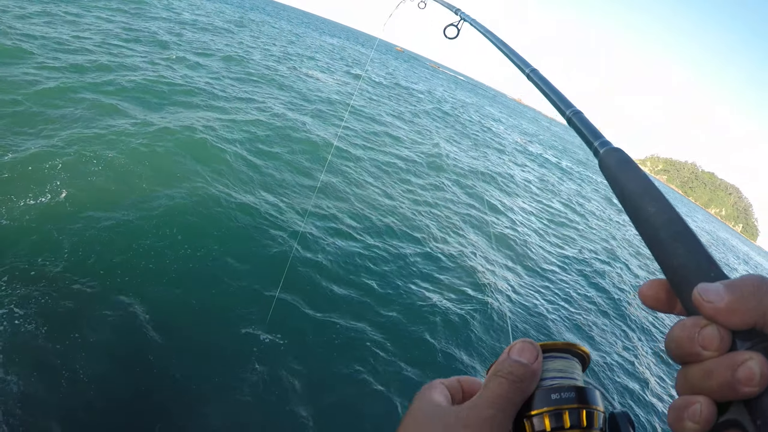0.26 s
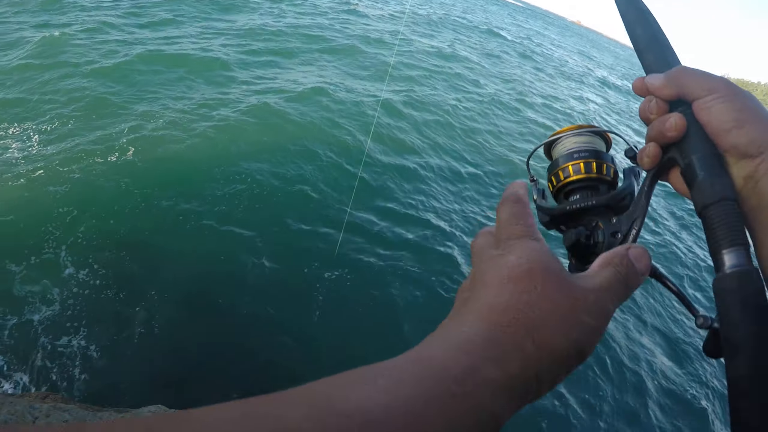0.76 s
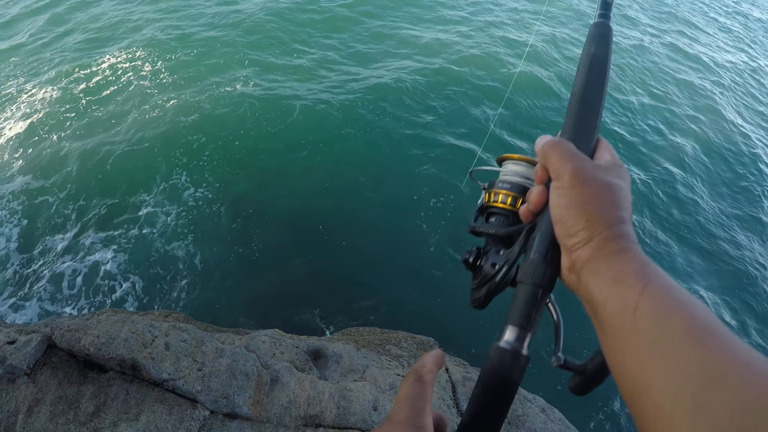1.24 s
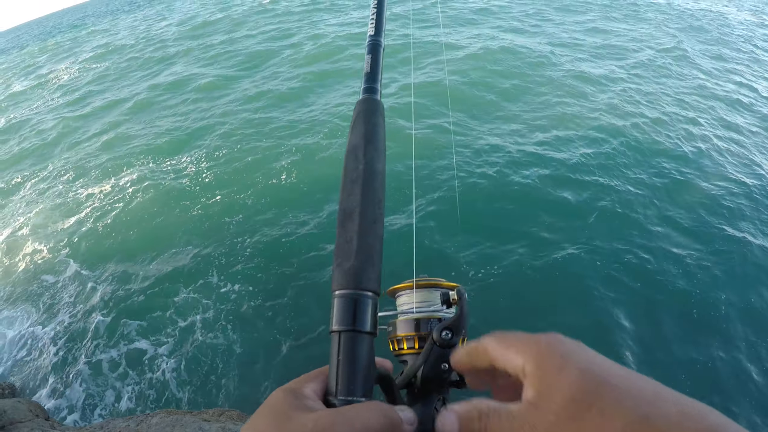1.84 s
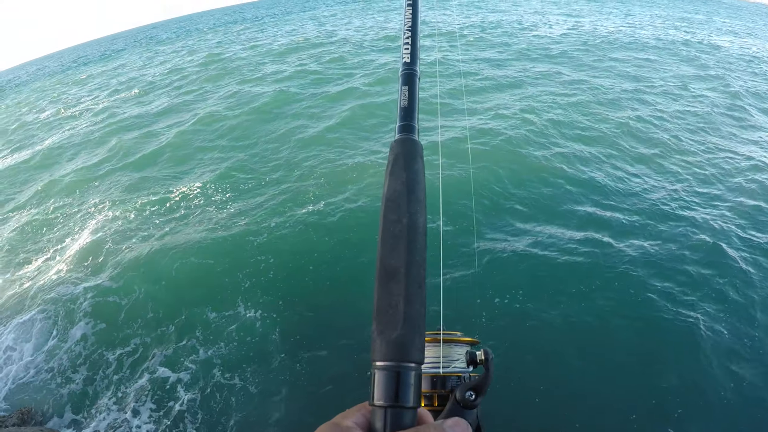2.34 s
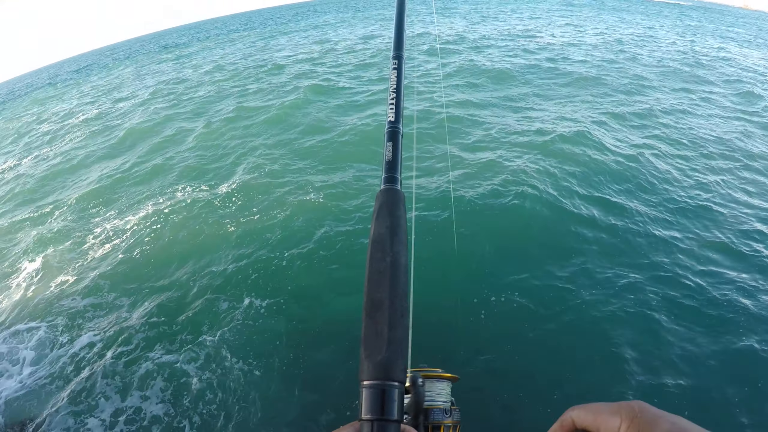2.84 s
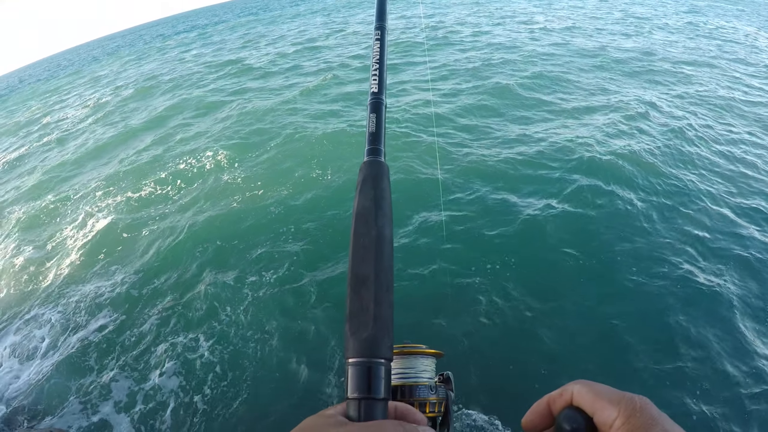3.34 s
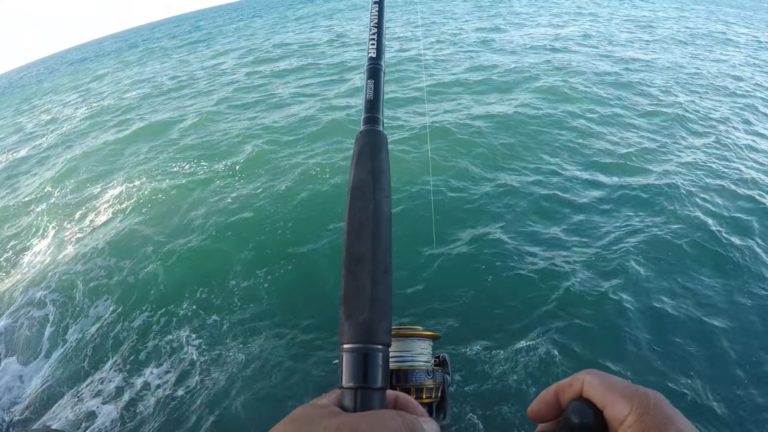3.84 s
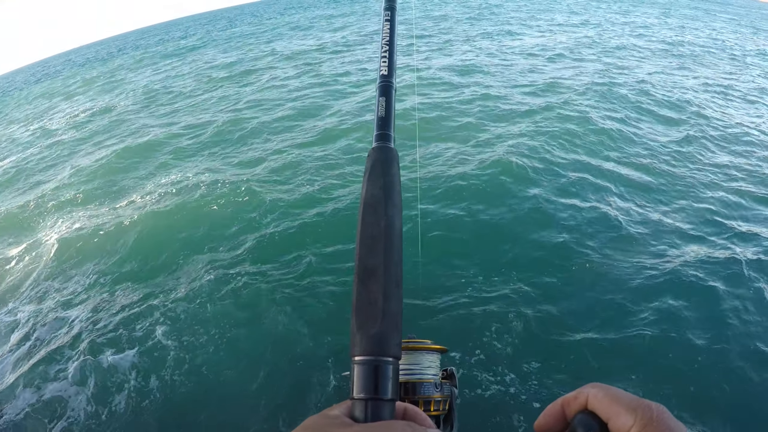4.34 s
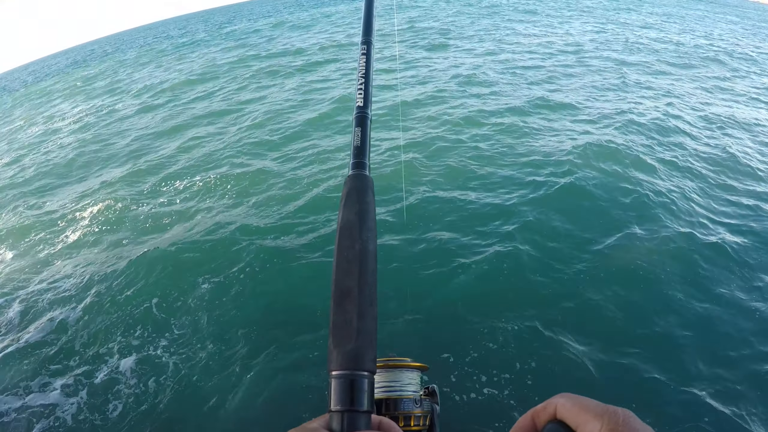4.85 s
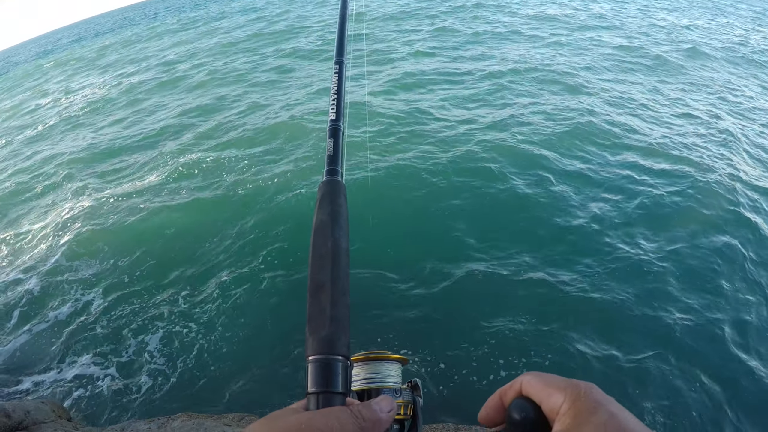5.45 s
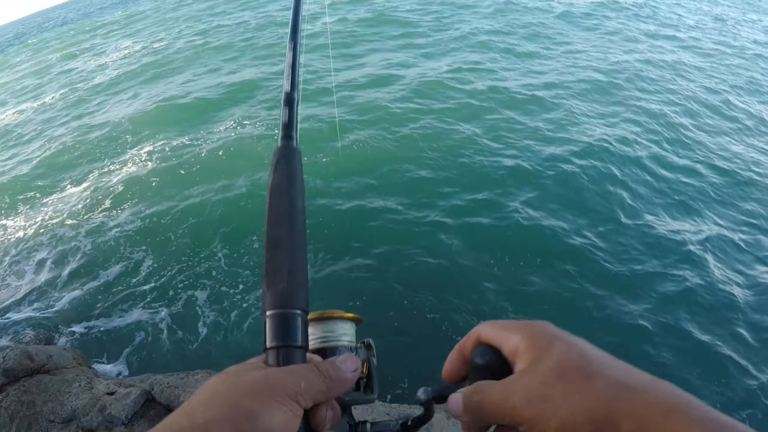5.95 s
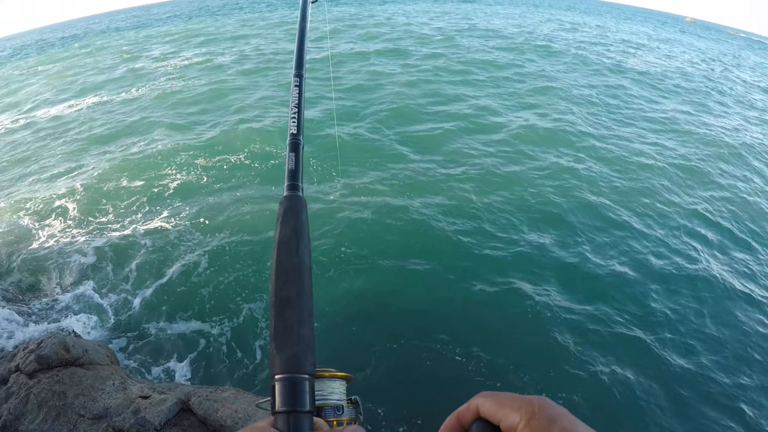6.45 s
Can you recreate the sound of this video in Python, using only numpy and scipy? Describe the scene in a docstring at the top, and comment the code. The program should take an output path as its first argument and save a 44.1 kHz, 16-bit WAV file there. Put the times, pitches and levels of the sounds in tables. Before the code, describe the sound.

Gusty wind buffets the microphone over sea washing on a rocky shore, with small drips and a few brief knocks on a fishing reel.

```python
"""A rocky shore, on a small camera's two microphone ports, out in gusty wind.
Right at the ports the wind rumbles, roars and buffets as lumpy pressure and small eddies.
Farther off and below, the sea washes and its foam fizzes; close by, drops splash on rock
and hands scuff a fishing reel, which rings briefly.
The camera starts in mono on the right port, then opens most of the way to stereo."""
import sys
import numpy as np
from scipy import signal
from scipy.fft import rfft, irfft
from scipy.io import wavfile
from scipy.ndimage import uniform_filter1d

SR = 44100
rng = np.random.default_rng(int(sys.argv[2]) if len(sys.argv) > 2 else 0)


def transcribe(u):
    """Save the signal u as a 16-bit wav file named by the first command-line argument.

    u: samples, shape (n,) or (channels, n), limited to [-1, 1]; the rate is SR.
    q: integer samples, one column per channel.
    """
    v = np.clip(np.atleast_2d(u).T, -1, 1)
    q = np.round(v * 32767).astype(np.int16)
    wavfile.write(sys.argv[1], SR, q)


N = 295470
HZ, FRAME_S = np.fft.rfftfreq(512, 1 / SR), np.arange(N // 128 + 2) * 128 / SR  # bands, frame times

# the sea below: (time [s], level [dB], body around 1 kHz [dB], left-right [dB])
SEA_WASH = [(0.0, -42, 5, 6.5), (0.28, -42, -6, 1), (0.41, -43.5, -11, -2), (0.78, -50, 5.5, 0),
            (1.06, -48, 3.5, -0.5), (1.68, -48.5, -3.5, 5), (2.56, -47, 3, 4.5), (3.5, -47, 0.5, 1),
            (3.97, -48, 3.5, 1), (4.35, -49, 6, 4), (4.55, -47.5, 4.5, 4), (4.79, -44, -1.5, 2),
            (4.91, -47.5, 4, 4.5), (5.43, -48.5, 4.5, 4), (5.67, -52, 19, 5), (6.05, -45, 0, 6),
            (6.27, -41.5, 0, 5.5), (6.47, -43, -1.5, 5.5), (6.56, -38, 3, 5.5), (6.7, -36, -3, 4)]
# colour of the wash as heard, with the treble cut off above 13 kHz: (frequency [Hz], level [dB])
HEARD_WASH_SPECTRUM = [(350, -3), (600, -3.5), (1100, -7), (1800, -8), (2400, -9.5), (3100, -15),
                       (5100, -17), (7600, -21), (8100, -24), (10200, -25.5), (11200, -33.5), (12600, -32),
                       (13500, -39), (15200, -56)]
# how alike the sea is at the two ports: (frequency [Hz], coherence [0-1])
SEA_COHERENCE = [(500, 0.91), (1000, 0.84), (1800, 0.33), (2700, 0.63), (4000, 0.25), (5200, 0.31),
                 (6800, 0.36), (9000, 0.083), (13000, .1)]
# resonances of a port: (frequency [Hz], half-width [Hz], gain [dB])
PORT_RESONANCES = [(2270, 160, -1), (3730, 77, 3.5), (4540, 1200, -1), (6400, 710, 6)]
# drops on nearby rock: (time [s], level [dB], pitch [Hz], left-right [dB], bandwidth [Hz])
ROCK_SPLASHES = [(1.1776, -27, 5090, 0, 2600), (1.284, -31.5, 2670, 2, 800), (1.6248, -35, 1970, 1, 600),
                 (2.1495, -33.5, 3770, -3, 2200), (2.6364, -29, 4540, 1, 2600),
                 (3.099, -31, 1870, -6, 2556), (3.2749, -38, 4010, -3, 1200), (3.595, -29, 5650, -10, 1700),
                 (3.65, -35, 1700, 2, 600), (3.684, -39, 2120, -10, 2300), (3.75, -31.5, 2584, -8, 2100),
                 (3.78, -29, 2170, -2, 1200), (3.838, -30, 6400, -3, 1400), (3.865, -30, 5600, -4, 800),
                 (3.872, -26.5, 1600, -4, 600), (3.892, -32.5, 3400, -2, 2200), (3.896, -34, 1920, 2, 600),
                 (3.9262, -34, 6260, -9, 1500), (3.9464, -29, 5800, -8, 2600),
                 (3.975, -28.5, 4440, 0, 3100), (4.177, -30, 6150, 16, 6000), (4.5985, -32, 6100, 3, 2400),
                 (4.603, -32, 2260, 8, 500), (4.633, -32, 6200, -10, 2100), (4.6587, -32, 5300, -3, 1500),
                 (4.9493, -34, 4170, 14, 2510), (5.9225, -26, 1900, 17, 3000), (6.264, -29, 2430, 8, 500),
                 (6.6868, -29, 6060, -11, 1900)]
# hands on the reel: (time [s], level [dB], length [s], favoured pitch [Hz], upper ring [dB])
REEL_SCUFFS = [(0.414, -26, 0.007, 1420, 2), (0.4237, -20, 0.0071, 2020, 10), (0.431, -22, 0.01, 2060, -2),
               (0.444, -23.5, 0.012, 2480, -3), (0.6416, -20.5, 0.012, 1460, -2.5),
               (0.653, -19.5, 0.0077, 1530, -5), (1.147, -21, 0.0036, 2500, -26)]
# ringing of the reel: (frequency [Hz], bandwidth [Hz], level [dB])
REEL_MODES = [(1530, 140, 4), (2040, 250, 8.5), (2520, 320, 0), (3250, 370, 2), (4270, 540, -18)]
# sharp puffs of roar: (time [s], level [dB], left-right [dB])
WIND_PUFFS = [(0.087, -21.5, -3), (0.153, -22.5, -4), (0.313, -24, -7), (1.025, -28, 0), (1.147, -22, -2),
              (1.482, -23, 14), (1.604, -19.5, 15), (1.639, -20, 2), (1.7, -17, 15), (1.799, -23, -2),
              (4.105, -31, -2.5), (4.221, -22.5, -7), (4.3, -31, -1), (4.416, -24.5, -4),
              (4.429, -25.5, -6), (5.319, -26, 12), (5.483, -33, -1), (5.53, -35, 0), (5.617, -23.5, -2),
              (5.683, -19, 1), (5.723, -16, 2), (5.913, -16.5, 5), (6.134, -26.5, 4), (6.608, -21.5, 0)]
# single shoves of air: (time [s], level [dB], pitch [Hz], left-right [dB])
WIND_BUFFETS = [(0.305, -1.5, 88, -3), (1.02, -13.5, 133, -10), (1.479, -20, 61.9, 2),
                (1.566, -11, 172, -6), (2.082, -8.5, 84, 2.5), (2.461, -17, 98, 4), (2.684, -25, 76.6, 2),
                (4.861, -19, 128, 20), (4.995, -20, 61, 2), (5.324, -25, 61.9, -2), (5.446, -30, 76, 1)]
# breeze under the gusts: (time [s], rumble [dB], roar [dB])
BREEZE_LEVELS = [(0, -21, -34), (.7, -31, -35.5), (.95, -28, -41), (1.35, -35, -39), (2.3, -23, -32),
                 (3.4, -36, -44.5), (3.9, -29, -44.5), (4.7, -31, -44), (5.25, -28, -37.5),
                 (6.2, -26.5, -40), (6.45, -31, -32.5), (6.7, -32, -32.5)]
# gusts on the ports: (time at full strength [s], hold [s], rumble [dB], roar [dB], swirl [dB])
WIND_GUSTS = [(0.0, 0.046, -31, -28.5, 1), (.085, 0.036, -14, -28, 1), (0.204, .04, -20.5, -39, -3),
              (0.269, 0.093, -11.5, -29.5, 0), (0.434, 0.036, -22, -31.5, 3),
              (0.602, 0.027, -19.5, -38, -1.5), (0.797, 0.009, -30, -38.5, -3),
              (1.029, 0.016, -12.5, -29, -1), (1.145, 0.0073, -19, -30.5, -2), (1.317, 0.011, -28, -42, -2),
              (1.475, 0.18, -18.5, -34, -1.5), (1.628, 0.059, -15.5, -21, -0.5),
              (1.715, 0.026, -16, -24, -1.5), (1.828, 0.013, -16.5, -28, 1.5),
              (1.928, 0.077, -19.5, -31, 2), (2.09, 0.093, -18.5, -35.5, -5),
              (2.247, 0.01, -16.5, -31.5, -2), (2.348, 0.029, -15.5, -39.5, -7),
              (2.46, 0.13, -24.5, -32, 0.5), (2.706, 0.03, -14.5, -32.5, -3), (2.786, 0.26, -19, -34, 4),
              (3.153, 0.041, -21.5, -40, 1), (3.29, 0.023, -20.5, -41, -2), (3.556, 0.049, -24, -51, -7),
              (3.678, 0.16, -24.5, -41.5, 2), (4.032, 0.024, -18, -37, 6), (4.154, 0.093, -17.5, -31.5, 3),
              (4.303, .05, -19.5, -28, 3), (4.415, 0.017, -13, -26, -0.5), (4.556, 0.064, -19, -33.5, 3),
              (4.744, 0.017, -26, -47, 2), (4.86, 0.066, -22, -32.5, 3.5), (4.992, 0.14, -19, -42, 0),
              (5.327, 0.021, -19, -27, 8), (5.36, 0.01, -17, -38, -8), (5.453, 0.1, -18, -30.5, 4.5),
              (5.572, 0.034, -18, -23.5, 6.5), (5.638, 0.079, -11.5, -26.5, 4),
              (5.724, 0.14, -16.5, -22.5, 4.5), (5.901, 0.066, -19, -30.5, 5.5), (6.064, .01, -16, -29, 2),
              (6.14, 0.014, -17.5, -31, 3), (6.303, 0.034, -22, -35.5, 5), (6.597, 0.0074, -15.5, -32, -4)]
# wind pressure common to both ports: (frequency [Hz], level [dB])
PRESSURE_SPECTRUM = [(8.8, -28), (15, -4), (44, -0.5), (122, -7.5), (288, -16), (320, -18.5), (609, -27),
                     (1500, -45.5), (1810, -53), (2500, -65), (3250, -62), (5500, -120)]
# small eddies that push the ports opposite ways: (frequency [Hz], level [dB])
EDDY_SPECTRUM = [(9, -36), (15, -14), (43, -11.5), (81, 0), (140, -1), (250, -5.5), (500, -10), (850, -13),
                 (1250, -23.5), (1700, -39.5), (2500, -42), (5500, -120)]
# tone of the mono opening, softer middle, brighter hiss reaching 15 kHz: (frequency [Hz], gain [dB])
MONO_OPENING_TONE = [(100, -2), (300, -2), (1300, -5), (2200, -1), (4000, 3.5), (6500, -3), (11000, 3.5),
                     (13000, -2), (15000, 16)]
# the camera opening to stereo: (time [s], stereo share [0-1])
STEREO_OPENING = [(1.31, 0), (1.6, 0.31), (2.05, 0.71)]


def amp(db):
    """Gain of a level in dB."""
    return 10 ** (np.asarray(db) / 20)


def unit_rms(x):
    """Scales to rms 1."""
    return x / np.sqrt(np.mean(x ** 2) + 1e-20)


def curve_at(points, hz):
    """Spectrum points joined on a log frequency axis."""
    f, value = np.transpose(points)
    return np.interp(np.log(hz + 1), np.log(f + 1), value)


def controls(table):
    """Each control of a timed table at frame rate."""
    s, *rest = np.transpose(table)
    return [np.interp(FRAME_S, s, column) for column in rest]


def place(mix, s, sound, pan_db):
    """Mixes a sound into both ports at time s; positive pan is left."""
    part = mix[:, round(s * SR):][:, :len(sound)]
    part += amp([[pan_db / 2], [-pan_db / 2]]) * sound[:part.shape[1]]


def coloured(x, spectrum, lo_hz, hi_hz):
    """Gives white noise a spectrum, with rms 1 in the band lo-hi."""
    hz = np.fft.rfftfreq(N, 1 / SR)
    gain = amp(curve_at(spectrum, hz))
    band_rms = np.sqrt(np.mean(gain ** 2 * (hz > lo_hz) * (hz < hi_hz)))
    return irfft(rfft(x) * gain / band_rms, N)


def shaped(x, field_db):
    """Applies a level that changes over frequency and time."""
    frames = signal.stft(x, nperseg=512, noverlap=384)[2]
    frames = frames * amp(field_db[..., :frames.shape[-1]])
    return signal.istft(frames, nperseg=512, noverlap=384)[1][..., :N]


def patches(bins, frames):
    """Random field of soft blotches over frequency and time."""
    field = rng.standard_normal((len(FRAME_S), len(HZ))).T
    for _ in range(2):
        field = uniform_filter1d(uniform_filter1d(field, bins, axis=0), frames, axis=1)
    return unit_rms(field)


def right_port_late(x, lag_s=0.00025):
    """Sound from the water reaches the right port later."""
    shift = np.exp(-2j * np.pi * np.fft.rfftfreq(N, 1 / SR) * lag_s)
    return np.array([x[0], irfft(rfft(x[1]) * shift, N)])


def housing(x, cutoff_hz=9000):
    """The camera housing dulls the top of close sounds."""
    return signal.sosfilt(signal.butter(3, cutoff_hz, fs=SR, output="sos"), x)


def sea(pops_per_s=1500):
    """Distant wash with bursting foam, coloured by the ports."""
    level_db, body_db, pan_db = controls(SEA_WASH)
    pop_size = amp(3.6 * np.minimum(rng.exponential(1, N), 5))
    foam = pop_size * (rng.random(N) < pops_per_s / SR) * rng.choice([-1, 1], N)
    right = unit_rms(rng.standard_normal(N) + 0.35 * unit_rms(foam))
    alike = np.clip(curve_at(SEA_COHERENCE, np.fft.rfftfreq(N, 1 / SR)), 0, 1)
    left = irfft(alike * rfft(right) + np.sqrt(1 - alike ** 2) * rfft(rng.standard_normal(N)), N)
    octaves = np.log2((HZ[:, None] + 1) / 3500)
    treble = np.clip(np.minimum(octaves, 3.5 - 2 * octaves), -0.3, 1)
    tone_db = -0.03 * (level_db + 47) * treble  # a louder wash is a little duller at 7 kHz
    tone_db += body_db * np.clip(-0.7 * octaves - 0.3, 0, 1)
    # steady microphone hiss above 10 kHz follows the wash less
    tone_db -= 0.5 * (level_db + 50.5) * np.clip(2 * octaves - 2.6, 0, 1)
    port_db = sum(db / (1 + ((HZ[:, None] - hz) / width) ** 2) for hz, width, db in PORT_RESONANCES)
    flicker_db = 1.22 * patches(bins=7, frames=20) + 0.99 * patches(bins=40, frames=3)
    field_db = level_db + tone_db + port_db + flicker_db + 0.11
    wash = coloured(np.array([left, right]), HEARD_WASH_SPECTRUM, lo_hz=2000, hi_hz=5000)
    return shaped(wash, np.array([field_db + pan_db / 2, field_db - pan_db / 2]))


def droplets(voices=24, drops_per_s=4.0):
    """Scattered small plops, each a few cycles rising in pitch; their level follows the wash."""
    out = np.zeros((2, N))
    level = amp(np.interp(np.arange(N) / SR, FRAME_S, controls(SEA_WASH)[0]) - 3)
    for log_hz, cycles, pan_db in rng.uniform([np.log(1300), 4, -6], [np.log(7500), 14, 4], (voices, 3)):
        age = np.arange(0, 1, np.exp(log_hz) / cycles / SR)
        plop = np.sin(2 * np.pi * cycles * age * (1 + 0.11 * age)) * np.sin(np.pi * age ** 0.69) ** 2
        hits = amp(3.25 * np.minimum(rng.exponential(1, N), 4)) * (rng.random(N) < drops_per_s / SR)
        place(out, 0, signal.oaconvolve(hits * level, plop), pan_db)
    return out


def splashes(t60_s=0.017, rise_s=0.00068):
    """Drops hit nearby rock: each a tick of tone with a broad band of noise round it."""
    out = np.zeros((2, N))
    t, hz = np.arange(2048) / SR, np.fft.rfftfreq(2048, 1 / SR)
    for s, db, pitch, pan_db, width in ROCK_SPLASHES:
        spray = irfft(rfft(rng.standard_normal(len(t))) / (1 + (2 * (hz - pitch) / width) ** 2))
        tick = 0.95 * unit_rms(spray) + 0.68 * np.sin(2 * np.pi * pitch * t)
        envelope = amp(db - 60 * t / t60_s) * (1 - np.exp(-t / rise_s))
        place(out, s, tick * envelope, pan_db)
    return out


def reel_scuffs():
    """Close, rough knocks of hands on the reel; the place of contact favours one low mode."""
    out, t = np.zeros((2, N)), np.arange(2500) / SR
    hz, width, mode_db = np.transpose(REEL_MODES)
    modes = np.sin(2 * np.pi * np.outer(t, hz)) * np.exp(-np.pi * np.outer(t, width))
    for s, db, length, favoured_hz, upper_db in REEL_SCUFFS:
        rub = rng.standard_normal(len(t)) * np.exp(-(t / length) ** 2)
        rub[0] += 6.0  # the first contact
        share_db = np.where(hz > 3000, upper_db, -6.0 * ((hz - favoured_hz) / 400) ** 2)
        ring = signal.fftconvolve(rub, modes @ amp(mode_db + share_db))[:len(t)]
        place(out, s, amp(db) * ring / abs(ring).max(), pan_db=0)
    return out


def puffs(rise_s=0.00028, decay_s=0.012, tilt_db_per_octave=-9):
    """Sudden bursts of turbulence right at the ports."""
    out = np.zeros((2, N))
    t, hz = np.arange(4096) / SR, np.fft.rfftfreq(4096, 1 / SR) + 1
    colour = amp(tilt_db_per_octave * np.log2(hz / 600)) / (1 + (250 / hz) ** 2) / (1 + (hz / 1800) ** 4)
    envelope = (1 - np.exp(-t / rise_s)) * np.exp(-t / decay_s)
    for s, db, pan_db in WIND_PUFFS:
        burst = unit_rms(irfft(rfft(rng.standard_normal(len(t))) * colour))
        place(out, s, amp(db) * burst * envelope, pan_db)
    return out


def buffets():
    """Air pushes and pulls on the ports: low thumps that die away in about two cycles."""
    out = np.zeros((2, N))
    for s, db, hz, pan_db in WIND_BUFFETS:
        periods = np.arange(0, 2.5, hz / SR)
        envelope = 2.2 * periods * np.exp(1 - periods * 2.9)
        swing = np.sin(2 * np.pi * (periods ** 1.27 + rng.random()))
        place(out, s, amp(db) * envelope * swing, pan_db)
    return out


def gusts(rise_db_per_s=476, fall_db_per_s=295):
    """Rumble, roar and swirl in dB: each gust swells over the breeze and sets the swirl while it leads."""
    s, hold, rumble_db, roar_db, swirl_db = np.transpose(WIND_GUSTS)[..., None]
    fade_db = rise_db_per_s * np.maximum(s - FRAME_S, 0)
    fade_db += fall_db_per_s * np.maximum(FRAME_S - s - hold, 0)
    breeze_rumble, breeze_roar = amp(controls(BREEZE_LEVELS)) ** 2  # breeze and gusts add as powers
    gust_roars = amp(roar_db - fade_db) ** 2
    rumble = breeze_rumble + (amp(rumble_db - fade_db) ** 2).sum(axis=0)
    roar = breeze_roar + gust_roars.sum(axis=0)
    return 10 * np.log10(rumble), 10 * np.log10(roar), (swirl_db * gust_roars).sum(axis=0) / roar


def wind(eddy_rumble_db=-11, eddy_roar_db=-9.5):
    """Lumpy pressure on both ports, rumble below and roar above, plus eddies of opposite sign."""
    rumble_db, roar_db, swirl_db = gusts()
    octaves = np.log2((HZ[:, None] + 1) / 130)
    high = np.clip(octaves / 1.57, 0, 1)  # share of the roar in each band
    reach_db = 0.16 * (roar_db + 27) * np.clip(octaves - 2.2, 0, 1.5)  # a stronger roar reaches higher
    flutter_db = 2.0 * high * patches(bins=40, frames=3)  # the roar comes in ragged bursts
    lumps_db = 0.46 * patches(bins=30, frames=5) + 1.16 * patches(bins=5, frames=4)
    field_db = (1 - high) * rumble_db + high * (roar_db + 10.5) + reach_db + flutter_db + lumps_db - 0.7
    pressure = shaped(coloured(rng.standard_normal(N), PRESSURE_SPECTRUM, lo_hz=25, hi_hz=200), field_db)
    eddy_db = field_db + (1 - high) * eddy_rumble_db + high * eddy_roar_db + swirl_db
    eddy_db += 1.7 * patches(bins=8, frames=5)
    eddies = shaped(coloured(rng.standard_normal(N), EDDY_SPECTRUM, lo_hz=25, hi_hz=200), eddy_db)
    return np.array([pressure + eddies, pressure - eddies])


def scene():
    """The shore at the two ports: drops and reel close by, wind on the camera, sea below."""
    close = housing(right_port_late(splashes() + droplets()) + reel_scuffs())
    return wind() + buffets() + puffs() + right_port_late(sea()) + close


def record(dry, ceiling=0.8, band_limit_hz=15100):
    """The camera fades from the right port alone toward stereo; soft overload, then the band limit."""
    pad = 2255  # samples that keep the filters clear of the ends
    dry = np.pad(dry, ((0, 0), (pad, pad)), "reflect", reflect_type="odd")
    size = dry.shape[1]
    stereo_share = np.interp((np.arange(size) - pad) / SR, *np.transpose(STEREO_OPENING))
    mono = irfft(rfft(dry[1]) * amp(curve_at(MONO_OPENING_TONE, np.fft.rfftfreq(size, 1 / SR))), size)
    blend = mono + stereo_share * (dry - mono)
    overloaded = ceiling * np.tanh(blend / ceiling)
    lowpass = signal.firwin(511, band_limit_hz, window=("kaiser", 9), fs=SR)
    return signal.oaconvolve(overloaded, lowpass[None], "same")[:, pad:-pad]


dry = scene()
out = record(dry)
transcribe(out)
```